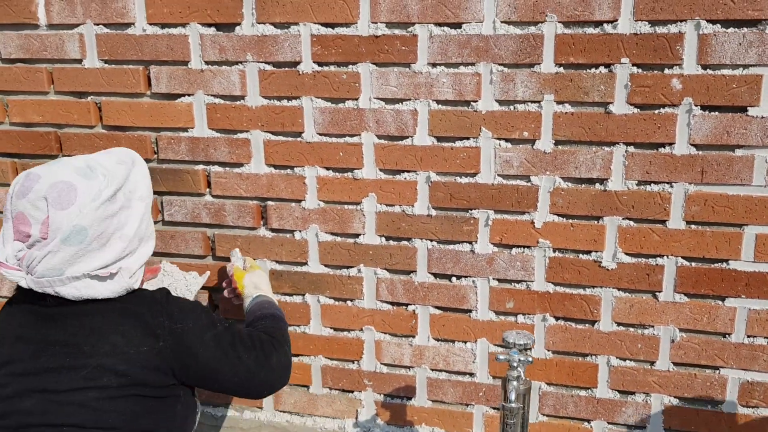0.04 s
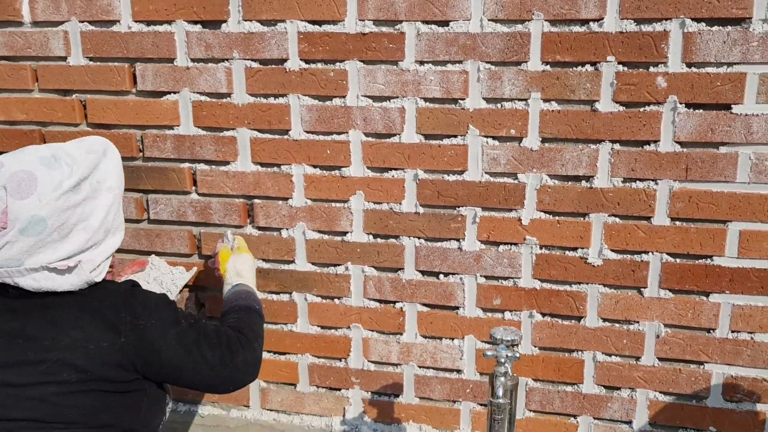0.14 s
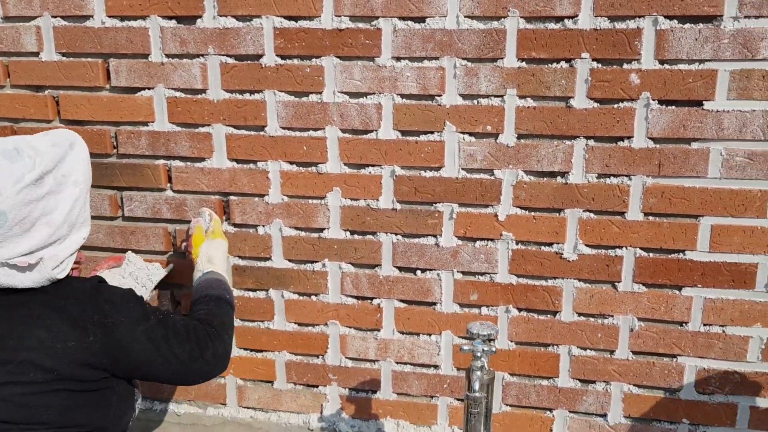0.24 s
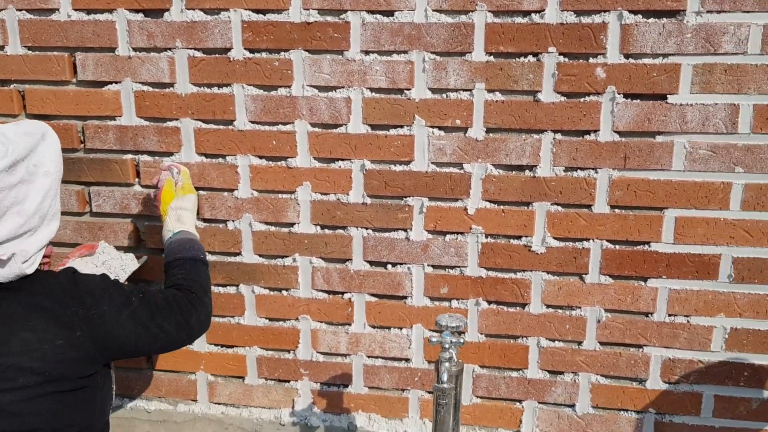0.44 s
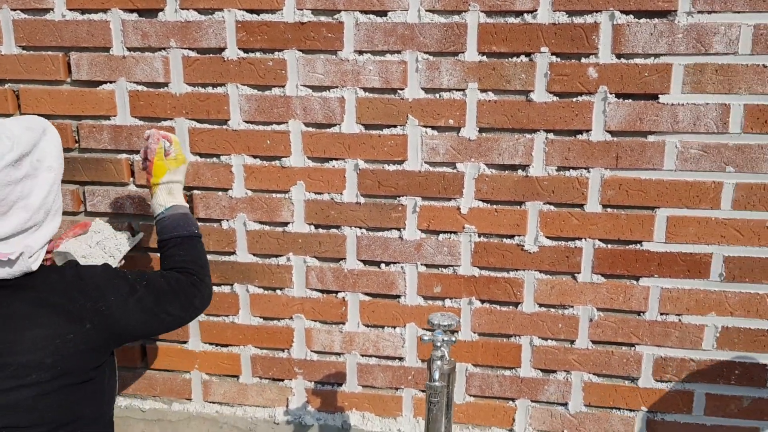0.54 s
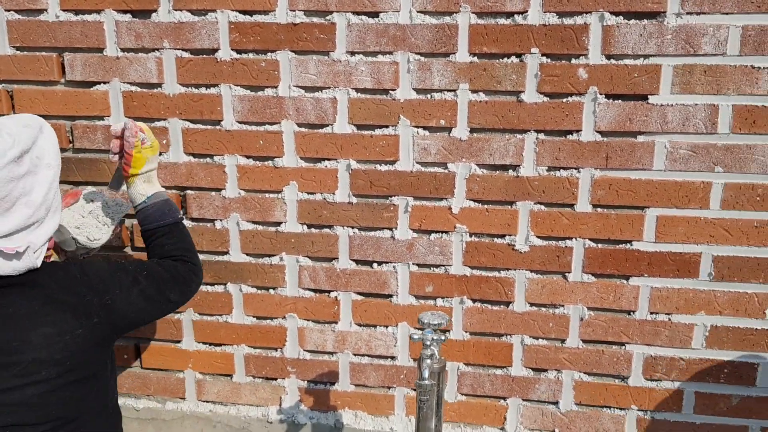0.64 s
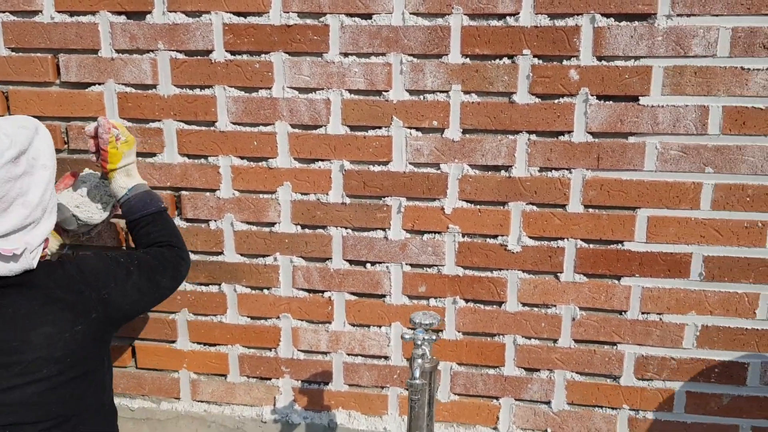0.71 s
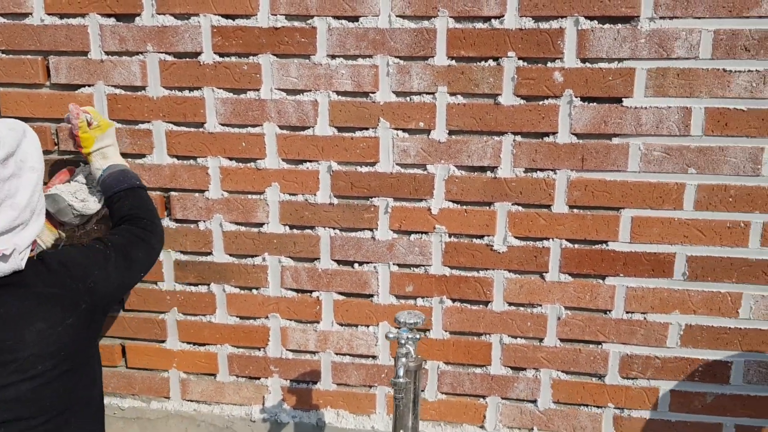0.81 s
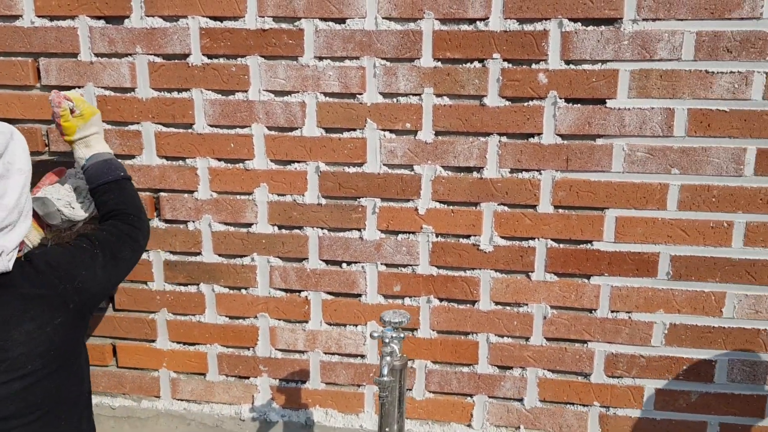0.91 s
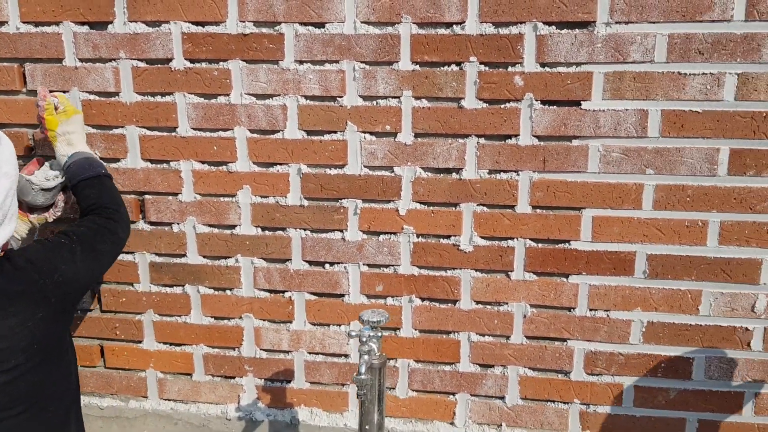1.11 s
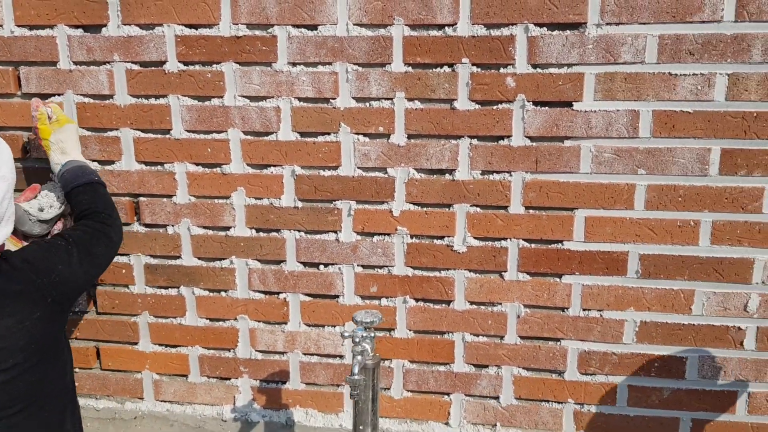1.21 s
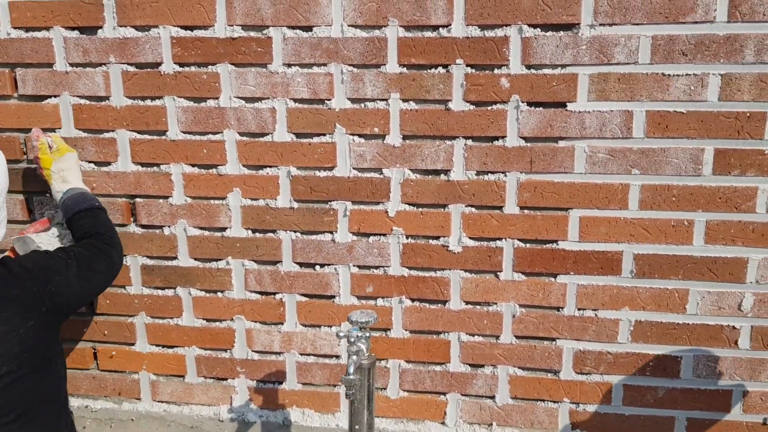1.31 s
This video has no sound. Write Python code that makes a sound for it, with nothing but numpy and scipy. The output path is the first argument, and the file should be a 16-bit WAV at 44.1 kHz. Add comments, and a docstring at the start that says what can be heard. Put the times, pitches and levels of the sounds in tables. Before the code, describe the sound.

A gloved hand rubs and scrapes gritty mortar on a brick wall, with dull bumps.

```python
"""Outdoors at a brick wall: a gloved hand rubs up the mortar joints, a little left of the microphone.
Sand grains crackle under the glove, cloth swishes, the glove sticks and slips, fingertips scuff.
Each rub is a stream of random, filtered impulses. Dull bumps over brick edges ring damped modes.
Ground and wall echo faintly. Behind: a hush, a dropping breeze, light puffs at the two microphone ports."""
import sys
import numpy as np
from scipy import signal
from scipy.fft import rfft, irfft
from scipy.io import wavfile

SR = 44100
rng = np.random.default_rng(int(sys.argv[2]) if len(sys.argv) > 2 else 0)


def generate_wav(signal):
    """Clip the signal to [-1, 1] and save it as 16-bit WAV at the path in sys.argv[1]."""
    frames = np.transpose(np.atleast_2d(signal))
    scaled = np.clip(frames, -1, 1) * 32767
    pcm = np.round(scaled).astype(np.int16)
    wavfile.write(sys.argv[1], SR, pcm)


N = 59535
T = np.arange(N) / SR

# outdoor hush spectrum: f/Hz, level/dB
HUSH_SPECTRUM = [(20,-6),(120,-2),(300,-7.5),(800,6),(1700,-4),(3500,-10.5),(16000,-24)]
# breeze rumble envelope: t/s, level/dB
BREEZE_ENVELOPE = [(0,-49.5),(.5,-53.5),(.85,-61),(1.1,-63.5),(1.2,-75),(1.35,-65)]
# breeze rumble spectrum: f/Hz, level/dB
BREEZE_SPECTRUM = [(15,-32),(48,7.5),(110,-8),(220,-18),(500,-39),(4000,-77)]
# wind puffs: t/s, width/s, level/dB, f/Hz, port (0 left, 1 right)
WIND_PUFFS = [(.01,0.035,-39,56,0),(0.064,0.035,-30,60.8,1),(.115,0.012,-33.5,65,1),(.168,0.02,-33,50,0),(0.196,0.034,-34.5,53.7,1),(0.312,0.1,-43,55,0),(0.404,0.0075,-29.5,62,0),(0.518,0.056,-35,52,0),(0.688,0.039,-32.5,53.2,0),(.83,0.087,-48,55,0),(1.066,0.0061,-30.5,72,0),(1.1,0.051,-46,45,0)]
# cloth sweeps: peak t/s, rise/s, fall/s, level/dB
CLOTH_SWEEPS = [(0.074,0.054,0.087,-47),(.905,0.024,0.033,-39.5),(1.332,0.033,0.097,-53)]
# cloth swish spectrum: f/Hz, level/dB
CLOTH_SPECTRUM = [(200,-39),(900,-8),(1500,-4.5),(2200,-0.5),(2700,2.5),(3500,3),(4400,-4),(5000,-2),(5650,4.5),(6400,-7),(7400,-6),(8500,0),(9800,-13.5),(16000,-4.5)]
# fingertip scuffs: t/s, level/dB, rise/s
FINGER_SCUFFS = [(0,-49.5,0.0092),(0.14,-32.5,0.0034),(0.178,-40,0.0056),(0.225,-40.5,0.0031),(.365,-34,0.0026),(0.376,-38,0.0023),(.402,-40,0.0028),(0.444,-43,0.0024),(0.782,-46,0.007),(1.055,-52.5,0.0032),(1.133,-53,0.0042),(1.253,-49.5,0.015),(1.305,-50.5,0.019)]
# scuff spectrum: f/Hz, level/dB
SCUFF_SPECTRUM = [(100,-19),(300,-16),(800,3),(1200,-7.5),(1750,-0.5),(2800,-6),(4500,-10),(16000,-41)]
# low scrape as the hand bears down: t/s, level/dB
SCRAPE_ENVELOPE = [(0,-50),(.04,-58),(.1,-55),(.135,-37),(.19,-47.5),(.225,-41.5),(.25,-46.5),(.3,-42),(.34,-41),(.378,-36.5),(.425,-42.5),(.49,-39),(.54,-47),(.56,-57),(.68,-55),(.75,-74),(.78,-70),(.795,-44.5),(.85,-60),(.92,-51.5),(1.035,-72),(1.065,-54.5),(1.2,-70),(1.255,-66.5),(1.27,-68),(1.35,-57.5)]
# scrape spectrum: f/Hz, level/dB
SCRAPE_SPECTRUM = [(60,-22),(150,-12),(240,-7),(330,-1.5),(450,0),(650,-8),(1000,-6),(1700,-8),(2400,-21),(4000,-18.5),(9000,-77.5)]
# sand hiss under the glove: t/s, level/dB
SAND_ENVELOPE = [(0,-46),(.03,-63),(.1,-53),(.14,-45),(.215,-44.5),(.228,-33),(.285,-42.5),(.38,-39.5),(.42,-48),(.46,-42),(.5,-46),(.56,-59),(.62,-60),(.665,-52),(.75,-60.5),(.776,-56),(.79,-42.5),(.825,-51),(.9,-44),(.97,-53.5),(1.03,-72.5),(1.09,-55),(1.15,-56),(1.19,-51),(1.35,-46)]
# larger grains cracking loose: t/s, level/dB
SAND_CRACKS = [(0.106,-49),(0.133,-50),(.147,-36.5),(0.196,-37),(.226,-35),(0.253,-50),(.267,-35.5),(0.296,-32.5),(0.343,-41),(0.626,-55.5),(0.663,-47.5),(0.741,-62),(1.059,-63),(1.31,-65)]
# sand spectrum: f/Hz, level/dB
SAND_SPECTRUM = [(300,-6),(1500,-7.5),(3000,-5.5),(4300,-8),(5400,-0.5),(6200,-2.5),(7100,-4.5),(7750,3),(8500,-3),(9300,-3),(10200,1.5),(10750,-2.5),(11300,3),(12700,-3.5),(14700,-1.5),(15800,-1)]
# bumps on brick: t/s, level/dB, contact/ms, tilt/(dB/octave), pitch ratio (higher at an edge)
BUMPS = [(.1463,-19,0.82,-2.5,1.11),(.1479,-20,0.24,5.5,1.06),(0.3071,-0.5,0.49,11.5,1.01),(0.3089,-0.5,0.65,5,0.944),(.3203,-30,2.1,7,5),(.3515,-28,0.93,0,0.98),(.3775,-36,2.7,0,1),(.3812,-23,0.47,3.5,1),(0.5006,-15.5,0.61,-1.5,1.023),(0.5185,-18,1.4,4,0.96),(.5322,-17.5,1.56,4.5,1.07),(.5412,-17.5,4.84,6,0.91),(0.7866,-18.5,0.99,-0.5,2.2),(0.79,-19,.9,-4.5,1.113),(0.7923,-16.5,0.57,0.5,2.05),(0.7954,-13,0.94,9,1.9),(0.8151,-32,1.4,-3,0.89),(0.8236,-34,3.6,-14,.96),(1.057,-48.5,0.3,11,1.4)]
# bump modes before tilt and pitch ratio: f/Hz, level/dB, T60/s
BUMP_MODES = [(147,-11,.08),(273.1,-1,0.098),(339,2.5,0.058),(423.4,8,0.039),(591.4,-1.5,0.063),(771,-6,0.051),(1080,-36,0.021),(1293,-10,.032),(1496,-37.5,0.06),(1664,-29.5,0.027),(1890,-34,.028)]


def amp(db):
    """dB to gain."""
    return 10 ** (np.asarray(db) / 20)


def unit_rms(x):
    """Scale to rms 1."""
    return x / np.sqrt(np.mean(x ** 2) + 1e-20)


def envelope(points):
    """Gain over time from (t/s, level/dB) points."""
    return amp(np.interp(T, *np.transpose(points)))


def colour(x, spectrum):
    """Minimum-phase filter through (f/Hz, level/dB) points; keeps white-noise power."""
    f_hz, level_db = np.transpose(spectrum)
    bins_hz = abs(np.fft.fftfreq(N, 1 / SR))
    gain = unit_rms(amp(np.interp(np.log(bins_hz + 1), np.log(f_hz), level_db)))
    response = np.exp(np.conj(signal.hilbert(np.log(gain))))
    taps = np.fft.ifft(response).real[:4096]
    return signal.fftconvolve(np.atleast_2d(x), taps[None], axes=1)[:, :N]


def wander(rate_hz):
    """Random drift, rms 1, rolling off above rate_hz."""
    f_hz = np.fft.rfftfreq(N, 1 / SR)
    band = f_hz / (f_hz + rate_hz / 10) / (1 + (f_hz / rate_hz) ** 4)
    return unit_rms(irfft(rfft(rng.standard_normal(N)) * band, N))


def pan(x, left_db):
    """Set the left level relative to the right."""
    return x * amp([[left_db / 2], [-left_db / 2]])


def ports(x, left_db, lead_s=0.000412):
    """Direct path to both ports; the left hears first."""
    taps = np.sinc((T[:64] - np.array([[0], [lead_s]])) * SR)
    return pan(signal.fftconvolve(x[None], taps, axes=1)[:, :N], left_db)


def grains(rate_per_s, spread_db):
    """Tiny slips: impulses of random time, size and sign."""
    size = amp(spread_db * np.minimum(rng.exponential(1, N), 4))
    sign = rng.choice([-1, 1], N)
    slips = rng.random(N) < rate_per_s / SR
    return unit_rms(size * sign * slips)


def friction(force, rate_per_s, spread_db, left_db, scatter):
    """Grains under a force; a power share scatters off hand and wall, independent at each port."""
    direct, left, right = (force * grains(rate_per_s, spread_db) for _ in range(3))
    diffuse = pan(np.array([left, right]), left_db)
    return np.sqrt(1 - scatter) * ports(direct, left_db) + np.sqrt(scatter) * diffuse


def hush(level_db=-63):
    """Outdoor air: steady noise."""
    return amp(level_db) * colour(rng.standard_normal((2, N)), HUSH_SPECTRUM)


def breeze():
    """Low rumble, fading as the breeze drops."""
    return envelope(BREEZE_ENVELOPE) * colour(rng.standard_normal((2, N)), BREEZE_SPECTRUM)


def wind_puffs():
    """Each eddy briefly rocks the air at one port."""
    out = np.zeros((2, N))
    for t_s, width_s, level_db, f_hz, port in WIND_PUFFS:
        pitch_hz = f_hz * (1 + 0.23 * wander(rate_hz=46))
        cycles = np.cumsum(pitch_hz) / SR + rng.random()
        swell = amp(level_db) * np.exp(-((T - t_s) / width_s) ** 2)
        out[port] += swell * np.sin(2 * np.pi * cycles)
    return out


def wall_echoes(x, t60_s=0.071, level_db=-13.5):
    """Short, faint reflections from ground and wall."""
    t_s = T[:8192]
    onset = np.clip(t_s / 0.0046 - .5, 0, 1)
    tail = rng.standard_normal((2, len(t_s))) * amp(-60 * t_s / t60_s) * onset
    tail /= np.linalg.norm(tail, axis=1, keepdims=True)
    return amp(level_db) * signal.fftconvolve(x, tail, axes=1)[:, :N]


def cloth_swish():
    """Fine fibres brush the brick in smooth sweeps."""
    speed = np.zeros(N)
    for peak_s, rise_s, fall_s, level_db in CLOTH_SWEEPS:
        from_peak = (T - peak_s) / np.where(T < peak_s, rise_s, fall_s)
        speed += amp(level_db) / np.cosh(np.clip(1.62 * from_peak, -20, 20))
    slips = friction(speed, rate_per_s=19000, spread_db=6.0, left_db=4.5, scatter=0.98)
    return colour(slips, CLOTH_SPECTRUM)


def finger_scuffs():
    """A fingertip catches a mortar ridge and lets go."""
    force = np.zeros(N)
    for t_s, level_db, rise_s in FINGER_SCUFFS:
        age = np.maximum(T - t_s, 0) / rise_s
        force += amp(level_db) * age * np.exp(1 - age)
    slips = friction(force, rate_per_s=5400, spread_db=2.0, left_db=0, scatter=0.98)
    return colour(slips, SCUFF_SPECTRUM)


def mortar_scrape():
    """Stick-slip of the glove on rough mortar: coarse, dull grains."""
    force = envelope(SCRAPE_ENVELOPE) * amp(1.3 * wander(rate_hz=80))
    slips = friction(force, rate_per_s=3000, spread_db=2.1, left_db=-0.9, scatter=0.37)
    return colour(slips, SCRAPE_SPECTRUM)


def sand_crackle(crack_decay_s=0.005):
    """Grains roll and snap in clumps under the glove; now and then a larger one cracks."""
    force = envelope(SAND_ENVELOPE) * amp(1.2 * wander(rate_hz=114))
    for t_s, level_db in SAND_CRACKS:
        force += amp(level_db) * (T >= t_s) * np.exp(-abs(T - t_s) / crack_decay_s)
    slips = friction(force, rate_per_s=10000, spread_db=2.5, left_db=5.5, scatter=0.77)
    return colour(slips, SAND_SPECTRUM)


def surface_patches(rub, depth_db=2.5, patch_hz=294, patch_s=0.013):
    """The rub's colour shifts as the glove meets new bits of surface."""
    f_hz, t_s, frames = signal.stft(rub, SR, nperseg=512, noverlap=384)
    blur_f = np.exp(-((f_hz[:, None] - f_hz) / patch_hz) ** 2)
    blur_t = np.exp(-((t_s[:, None] - t_s) / patch_s) ** 2)
    patches = unit_rms(blur_f @ rng.standard_normal(frames.shape[1:]) @ blur_t)
    gain = unit_rms(amp(depth_db * patches))
    return signal.istft(frames * gain, SR, nperseg=512, noverlap=384)[1][:, :N]


def brick_bumps(low_cut_hz=98):
    """A padded push, as long as the contact, excites well-damped modes."""
    out, t_s = np.zeros(N), T[:8192]
    f_hz, mode_db, t60_s = np.transpose(BUMP_MODES)[:, :, None]
    for start_s, level_db, contact_ms, tilt_db_per_oct, pitch_ratio in BUMPS:
        weight = amp(mode_db + tilt_db_per_oct * np.log2(f_hz))
        modes = amp(-60 * t_s / t60_s) * np.cos(2 * np.pi * f_hz * pitch_ratio * t_s)
        ring = (weight * modes).sum(0) / weight.sum()
        push = np.sin(np.pi * np.minimum(t_s * 1000 / contact_ms, 1)) ** 2
        bump = amp(level_db) * signal.fftconvolve(ring, push / push.sum())
        slot = out[round(start_s * SR):][:len(t_s)]
        slot += bump[:len(slot)]
    low_cut = signal.butter(1, low_cut_hz, "high", fs=SR)  # a small patch of brick radiates little bass
    return ports(signal.lfilter(*low_cut, out), left_db=2.0)


def scene():
    """Hand on the wall and its echoes, over hush and wind."""
    rub = sand_crackle() + cloth_swish() + mortar_scrape() + finger_scuffs()
    hand = surface_patches(rub) + brick_bumps()
    return breeze() + hush() + wall_echoes(hand) + wind_puffs() + hand


def record(dry, cutoff_hz=15950):
    """Band limit: steep FIR low-pass."""
    taps = signal.firwin(511, cutoff_hz, window=("kaiser", 9), fs=SR)
    return signal.oaconvolve(dry, taps[None], "same")


dry = scene()
out = record(dry)
generate_wav(out)
```